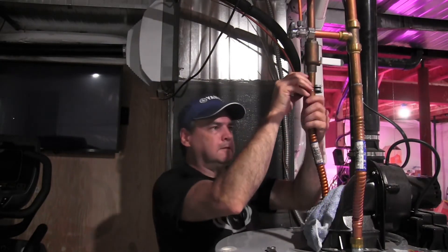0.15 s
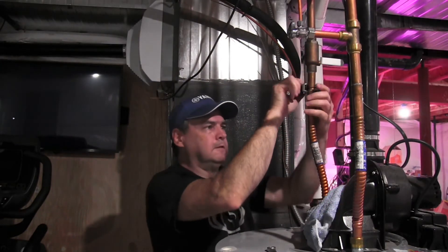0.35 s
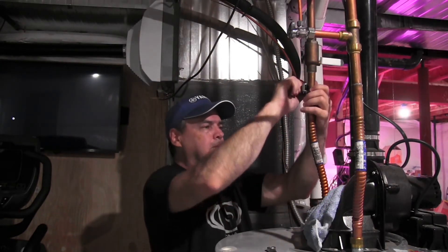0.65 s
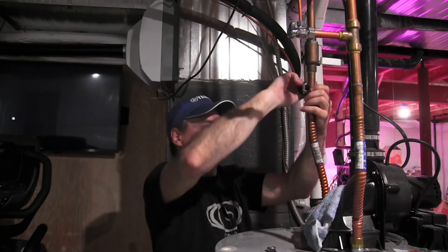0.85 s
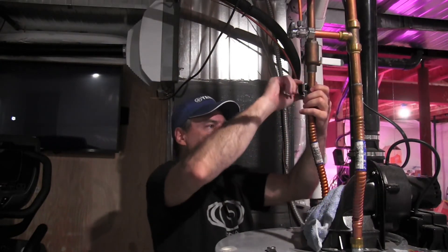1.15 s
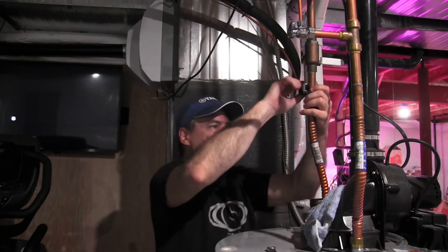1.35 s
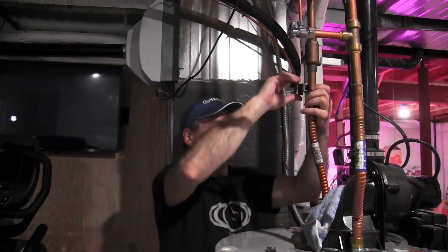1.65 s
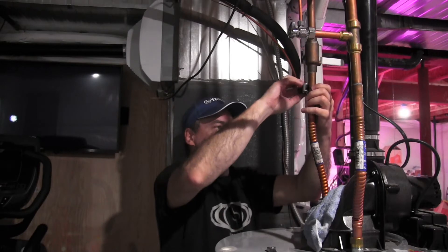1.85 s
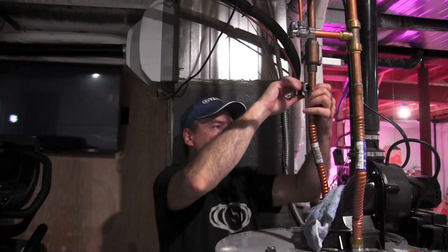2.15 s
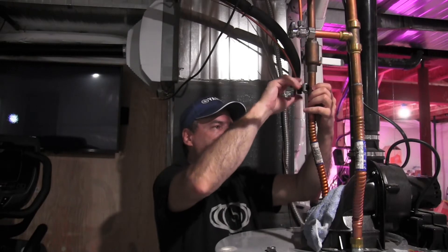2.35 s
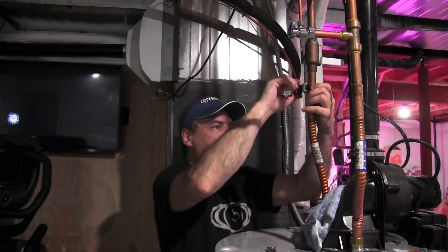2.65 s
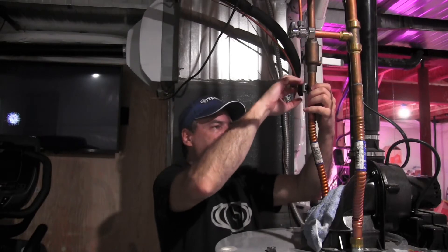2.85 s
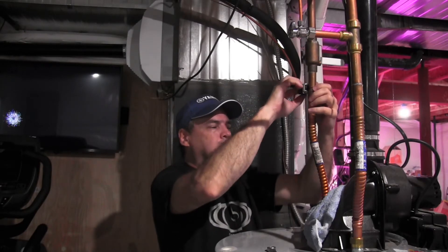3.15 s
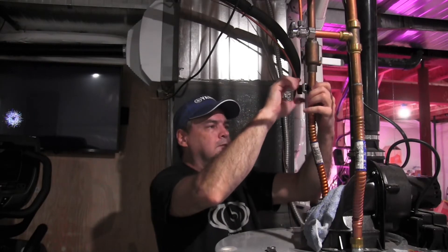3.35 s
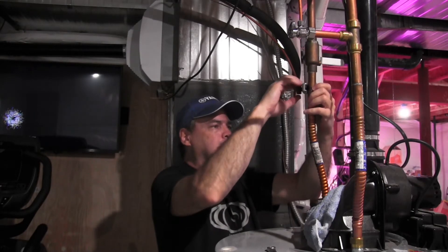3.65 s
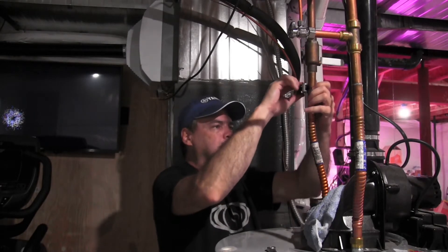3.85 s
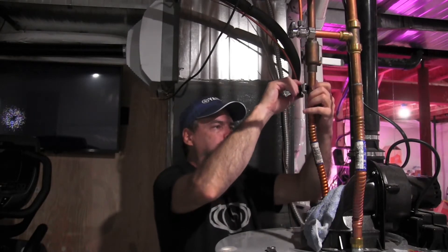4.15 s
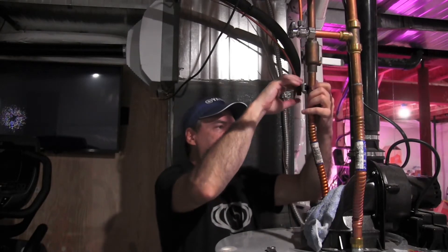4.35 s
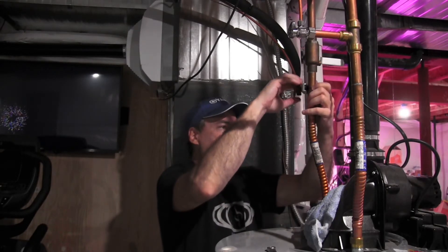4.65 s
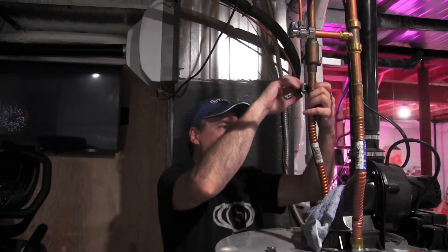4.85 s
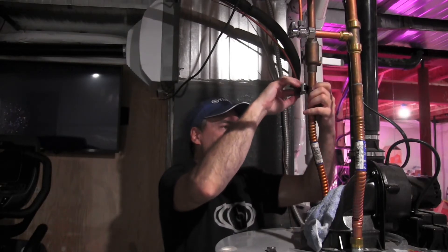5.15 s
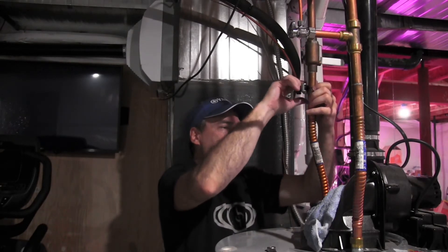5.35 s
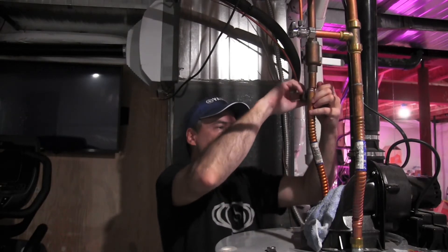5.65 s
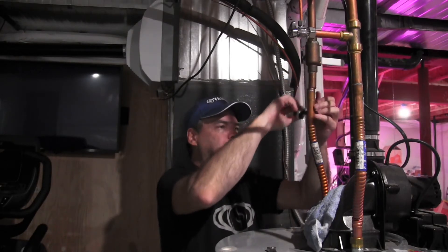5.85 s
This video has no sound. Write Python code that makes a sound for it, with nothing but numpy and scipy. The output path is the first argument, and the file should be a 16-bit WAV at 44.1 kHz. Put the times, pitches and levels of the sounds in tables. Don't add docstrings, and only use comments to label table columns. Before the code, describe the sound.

A hand-turned cutter works on hanging copper pipe, heard close in a boxy basement. Deep soft rumble and a brief skin-on-metal rub come first, then irregular muted jolts, woody bumps against clips and sparse fine ticks, the pipe humming low as it sways. Finally hard metal knocks burst out, followed by a clink and a crisp returning hit. Low air noise, weak mains hum and microphone hiss continue throughout.

```python
import sys
import numpy as np
from scipy import signal
from scipy.io import wavfile

SR = 44100
rng = np.random.default_rng(int(sys.argv[2]) if len(sys.argv) > 2 else 0)


def generate_wav(signal):
    frames = np.transpose(np.atleast_2d(signal))
    scaled = np.clip(frames, -1, 1) * 32767
    pcm = np.round(scaled).astype(np.int16)
    wavfile.write(sys.argv[1], SR, pcm)


def voltage_ratio(level):
    return 10 ** (np.asarray(level, float) / 20)


N = 265482


def at_hz(points, hz):
    f, value = np.transpose(points)
    return np.interp(np.log(hz), np.log(f), value)


def rms_one(x):
    return x / np.sqrt(np.mean(x ** 2) + 1e-20)


def unit(x):
    return x / np.linalg.norm(x, axis=1, keepdims=True)


def drift(rate_hz):
    knots = rng.standard_normal(200)
    return np.interp(np.arange(N) / SR * rate_hz, np.arange(200), knots)


def band(x, low_hz, high_hz):
    limits = [low_hz, min(high_hz, .45 * SR)]
    return signal.sosfilt(signal.butter(2, limits, "band", fs=SR, output="sos"), x)


def ring(clicks, hz, t60):
    r = voltage_ratio(-60 / (max(t60, .01) * SR))
    w = 2 * np.pi * hz / SR
    return signal.lfilter([0, np.sin(w)], [1, -2 * r * np.cos(w), r * r], clicks + 1e-18)


def stereo_bands(size, gain_at, likeness):
    edges = 25 * 2 ** np.arange(0, 9.7, 1 / 3)
    white = rng.standard_normal((2, 2, size))
    out = 0
    for k, (low, high) in enumerate(zip(edges, edges[1:])):
        mid, side = band(white[k % 2], low, high)
        hz = np.sqrt(low * high)
        alike = np.clip(at_hz(likeness, hz), 0, 1)
        stereo = np.sqrt(1 + alike) * mid + np.sqrt(1 - alike) * side * [[1], [-1]]
        out = out + gain_at(hz) * stereo
    return out


def swells(rows, rise_db_per_s, fall_db_per_s):
    t = np.arange(N) / SR
    total = 0
    for start, end, db in rows:
        rise = rise_db_per_s * np.maximum(start - t, 0)
        fall = fall_db_per_s * np.maximum(t - end, 0)
        total = total + voltage_ratio(db - rise - fall)
    return total


def slips(per_second):
    sizes = voltage_ratio(2.5 * np.minimum(rng.exponential(1, N), 4)) * rng.choice([-1, 1], N)
    return sizes * (rng.random(N) < per_second / SR) + 1e-18


def air():
    # f/Hz, level/dB per Hz
    colour = [(20, -35), (40, -9), (60, -8), (92, -15.5), (135, 2.5), (230, -5.5), (335, -6), (560, -10),
              (760, -9.5), (1300, -14.5), (1850, -13), (2900, -18.5), (8000, -26), (15800, -32.5)]
    # f/Hz, likeness (0 to 1)
    likeness = [(60, 1), (250, 0.72), (600, 0.06), (1500, 0.37), (4000, 0.68), (12000, 0.59)]
    # f/Hz, level/dB rms
    hum = [(59.7, -69), (1798, -77)]
    noise_db = -55
    noise = stereo_bands(N, lambda hz: voltage_ratio(at_hz(colour, hz)), likeness)
    t = np.arange(N) / SR
    tones = 0
    for hz, db in hum:
        tones = tones + np.sqrt(2) * voltage_ratio(db + 1.3 * drift(6.1)) * np.sin(2 * np.pi * hz * t)
    return voltage_ratio(noise_db) * rms_one(noise) + tones


def rumble():
    # t/s, level/dB
    path = [
        (0, -59),
        (.5, -74),
        (.75, -56.5),
        (1.2, -60),
        (1.6, -59),
        (2.2, -79),
    ]
    s, db = np.transpose(path)
    times = [s[0] - .05, *s, s[-1] + .02]
    level_db = np.interp(np.arange(N) / SR, times, [-110, *db, -110])
    return voltage_ratio(level_db) * rms_one(band(rng.standard_normal(N), 26.7, 255))


def sway():
    # t/s, level/dB
    swings = [(.2, -57.5), (1.51, -75), (2.6, -60), (2.9, -58), (3.14, -49), (3.34, -56.5), (3.45, -56),
              (3.96, -45.5), (4.05, -73), (4.3, -59), (5.19, -50.5), (5.55, -47)]
    gain = swells([(s, s, db) for s, db in swings], rise_db_per_s=155, fall_db_per_s=148)
    return gain * rms_one(ring(slips(900), 337.6, 0.11))


def rub():
    # t/s, level/dB
    catches = [
        (.618, -50.5),
        (1.033, -45),
        (1.23, -51),
    ]
    slide = swells([(0.72, 1.27, -54)], rise_db_per_s=600, fall_db_per_s=600)
    catch = swells([(s, s, db) for s, db in catches], rise_db_per_s=211, fall_db_per_s=222)
    skin = rms_one(band(band(slips(500), 140, 312), 45, 410))
    return np.maximum(slide, catch) * skin


def response(modes):
    # f/Hz, level/dB per Hz
    colour = [(35, -48), (60, -9), (174, -3), (400, -0.5), (600, -2.5), (850, -1.5), (1200, -12),
              (2000, -12.5), (2800, -20.5), (3400, -44), (4400, -33), (6000, -28), (11000, -36.5),
              (15500, -68)]
    # f/Hz, t60/s
    fade = [(60, 2.8), (160, 0.83), (420, 0.45), (1100, 0.53), (2900, 0.45), (7700, 0.51)]
    # f/Hz, likeness (0 to 1)
    likeness = [(60, .995), (250, 0.94), (600, 0.67), (2000, 0.71), (5000, 0.39), (12000, 1)]
    t = np.arange(int(.6 * SR)) / SR

    def echo_gain(hz):
        swell = 1 - np.exp(-t / (0.00024 + 0.4 / hz))
        early = 1 + voltage_ratio(6.5 - 60 * t / 0.11)
        return voltage_ratio(at_hz(colour, hz) - 60 * t / max(at_hz(fade, hz), .05)) * swell * early

    echo = stereo_bands(len(t), echo_gain, likeness)
    tones = sum(voltage_ratio(db) * ring(t == 0, hz, t60) for hz, db, t60 in modes)
    crack = band(t == 0, 490, 4250)
    return echo, tones * np.ones((2, 1)), crack * np.ones((2, 1))


def rattle(rows, share, first, count=40):
    draw = rng.random((len(rows), 3, count))
    late = 2.2 * draw[:, 0] ** 1.4
    late[:, 0] = 0
    seconds = rows[:, :1] + share * late * np.abs(rows[:, -1:])
    at = (seconds * SR).astype(int).clip(0, N - 1)
    size = (1.2 + draw[:, 1]) * np.sign(draw[:, 2] - .5) * np.exp(-.6 * late)
    size[:, 0] = first
    return at, unit(size)


def contacts(table, treble_db):
    band_octaves = [0, 1.13, 2.42, 3.7, 5.1]
    s, db, octaves, narrow, length = np.array(table).T[:, :, None]
    bands_db = db - np.abs(narrow) * np.abs(np.array(band_octaves) - octaves)
    bands_db[:, -2:] += treble_db
    return np.hstack([s, bands_db, length])


def strike(rows, modes, extra_ring_db, thud_db, cutter_db):
    edges = [55, 240, 500, 1150, 3200, 5800, 17000]
    # ring/dB and crack/dB against the echo, share of rattle length, weight of first touch
    band_mix = [(-1, -36, 1.177, 7.3), (-3.5, -8.5, 1.3, 5.7), (-1.5, -10, 1.1, 3.6), (-8.5, -11.5, .9, 4),
                (-2, -6, .7, 4.2), (-3.5, -31, 0.99, 2.3)]
    # f/Hz, level/dB, t60/s
    cutter_modes = [(4170, -14, .011), (4420, -18, 0.011), (4260, -38, 0.05)]
    start = int(rows[:, 0].min() * SR) - 1
    answers = response(modes)
    levels = [rows[:, 1] + thud_db, *rows[:, 1:-1].T]
    layers = []
    for low, high, db, mix in zip(edges, edges[1:], levels, band_mix):
        ring_db, crack_db, share, first = mix
        at, size = rattle(rows, share, first)
        heights = size * voltage_ratio(db)[:, None]
        clicks = np.bincount(at.ravel(), heights.ravel(), N)[start:]
        echo, tones, crack = (unit(band(x, low, high)) for x in answers)
        part = unit(echo + voltage_ratio(ring_db + extra_ring_db) * tones + voltage_ratio(crack_db) * crack)
        part = part * np.sqrt(SR / 20)
        layers.append(signal.fftconvolve(clicks[None], part, axes=1)[:, :N - start])
    push = np.gradient(layers[-2], axis=1)
    cutter = sum(voltage_ratio(db + cutter_db) * ring(push, hz, t60) for hz, db, t60 in cutter_modes)
    return np.pad(sum(layers) + cutter, ((0, 0), (start, 0)))


def held_pipe():
    # t/s, level/dB, brightness/octaves, narrowness/dB per octave, rattle length/s
    tugs = [(1.407, -41, 0.72, 3, 0.019), (1.439, -36.5, 2.14, 5.5, 0.0032),
            (1.461, -41, 0.088, 12, 0.0055), (1.487, -53, .1, 12, .005), (2.392, -45, 0.25, 4, .012),
            (2.457, -39, 0.89, 11.5, 0.013), (2.681, -48, 1.44, 11, .008), (2.735, -47.5, 1.2, 3, .03),
            (3.005, -38.5, 0.74, 6, 0.0035), (3.017, -41, 1.2, 9, 0.0017), (3.095, -46, 0.81, 6, 0.008),
            (3.579, -48.5, 0.46, 7.5, 0.016), (3.77, -43.5, 0.37, 2.5, .011), (3.907, -42, 0.99, 8, 0.0084),
            (4.553, -53, 0.92, 3.5, 0.017), (4.842, -45.5, 1.03, 4.5, 0.02), (5.015, -38, 1.34, 6, 0.007),
            (5.412, -38, 0.78, 16, 0.0091)]
    # t/s, level/dB, brightness/octaves, rattle length/s
    ticks = [
        (1.472, -66, 3, 0.037),
        (1.594, -43.5, 1.94, .006),
        (1.628, -59, 4.1, 0.018),
        (1.668, -58, 2.9, 0.016),
        (2.273, -57.5, 2.9, .0093),
        (3.003, -48, 3.3, 0.0028),
        (4.22, -53.5, 1.8, .012),
        (5.016, -56, 1.8, 0.0092),
        (5.331, -50.5, 2.1, 0.004),
    ]
    # t/s, level/dB, brightness/octaves
    bumps = [(1.818, -47.5, 0.5), (2.148, -50.5, 0.71), (2.197, -45.5, 0.41), (2.318, -50.5, 0.53),
             (2.421, -48.5, -.15), (2.474, -45, 0.26), (2.536, -63, 0.88), (2.839, -50, 0.23),
             (3.132, -47.5, 0.42), (3.21, -51, 0.27), (3.31, -52.5, 0.39), (3.5, -54, 0.6),
             (3.8, -37, 0.51), (3.94, -55, -0.54), (4.021, -59, -0.014), (4.246, -45.5, 0.42),
             (4.499, -53, 0.19), (4.783, -49, 0.026), (4.918, -51.5, 0.26), (5.139, -45.5, 0.41),
             (5.178, -49.5, 0.94), (5.502, -48, 0.19)]
    # f/Hz, level/dB, t60/s
    pipes = [(76, 16, 2.1), (113, 20.5, 0.75), (173.3, 35, 1.1), (246, 24, 0.36), (275, 14, 0.55),
             (328.3, 40, 0.19), (434, 35, 0.23), (487.4, 28, 0.44), (520, 47, 0.46), (733, 0, 0.12),
             (781, 27, 0.26), (710, 19, 0.28), (946, 44.5, 0.037), (800, 23, 0.14), (1160, 19, 0.29),
             (1176, 19, 0.076), (1360, 15, 0.57), (1320, 13, 0.11), (1565, 41.5, 0.13), (1810, 13, 0.34),
             (1850, -8, 0.2), (2100, 20, 0.53), (2280, -18, 0.15), (2420, -16, 0.51), (2740, -19, 0.067)]
    grip_spread_db = 6.0
    touches = list(tugs)
    touches += [(s, db, octaves, 10, .014) for s, db, octaves in bumps]
    touches += [(s, db, octaves, 5.5, length) for s, db, octaves, length in ticks]
    held = contacts(touches, treble_db=-13.5)
    out = 0
    for k in range(3):
        grip = [(hz, db + grip_spread_db * rng.standard_normal(), t60) for hz, db, t60 in pipes]
        out = out + strike(held[k::3], grip, extra_ring_db=-3, thud_db=-120, cutter_db=-14)
    return out


def freed_pipe():
    # t/s, level/dB, brightness/octaves, narrowness/dB per octave, rattle length/s
    knocks = [
        (5.571, -27.5, 1.1, 5.9, 0.0023),
        (5.576, -17, 1.1, 4.83, 0.006),
        (5.586, -18.5, 1.25, 5.6, 0.0065),
        (5.597, -26, 0.49, 8.1, 0.0073),
        (5.624, -25, .0, 3.7, .005),
        (5.638, -28.5, 0.66, 3.6, .005),
        (5.681, -26, 1.64, 14.5, .006),
    ]
    clink = [
        (5.700, -32, 1.54, 11, .004),
        (5.709, -30, 0.81, 5.9, .006),
    ]
    swing_back = [
        (5.952, -26, 3.4, 1.94, 0.0016),
        (5.955, -20, 2.2, 5.6, 0.0015),
        (5.961, -31, 2.6, 6.5, 0.0024),
        (5.967, -28, 0.5, 3.2, 0.0083),
    ]
    # f/Hz, level/dB, t60/s
    parted = [(76.35, 17, 1.4), (110.5, 17, 1.3), (177.5, 30, 0.7), (247.3, 26.5, 0.31), (281, 30, 0.27),
              (327, 29, 0.7), (445, 14, 0.9), (554, 24, 0.41), (708, 23.5, 0.22), (773, 28, .15),
              (900, 24.5, 0.084), (1335, 10, 0.23), (1546, 24, 0.065), (1943, 17, .15)]
    # f/Hz, level/dB, t60/s
    clink_modes = [(565, 0.5, 0.28), (740, -7, 0.16), (1254, -1, 0.17), (1525, 8, 0.29), (1820, -4, .2),
                   (2520, -17, .2), (3670, -29, .1), (5060, -22, .05), (6780, -13, .16), (6900, -19, .12)]
    # f/Hz, level/dB, t60/s
    swing_modes = [(183.6, 2, 0.64), (345, -7, 0.35), (416, 3.5, 0.12), (594, 0.5, 0.23), (888, -14, 0.18),
                   (1113, -11, 0.13), (1273, 4, 0.17), (1270, -2, 0.088), (1470, 14.5, 0.023),
                   (1792, 3.5, 0.32), (1900, -8, 0.12), (4280, -22, 0.073), (4370, -23.5, 0.23),
                   (6560, -19, .1)]
    # extra ring/dB, thud/dB
    spot_mix = [(3.5, 1.5), (2.5, -3), (5.5, -8.5)]
    blows = [knocks, clink, swing_back]
    spots = [parted, clink_modes, swing_modes]
    out = 0
    for table, modes, (extra_ring_db, thud_db) in zip(blows, spots, spot_mix):
        rows = contacts(table, treble_db=-6.5)
        out = out + strike(rows, modes, extra_ring_db, thud_db, cutter_db=0)
    return out


def scene():
    left_db = -0.6
    balance = voltage_ratio(np.array([[left_db], [-left_db]]) / 2)
    return (air() + rumble() + sway() + rub() + held_pipe() + freed_pipe()) * balance


def band_limit(x):
    return signal.sosfilt(signal.butter(12, 15730, fs=SR, output="sos"), x)


def record(dry):
    mix = signal.sosfilt(signal.cheby2(12, 70, 16600, fs=SR, output="sos"), dry)
    return band_limit(mix)


dry = scene()
out = record(dry)
generate_wav(out)
```